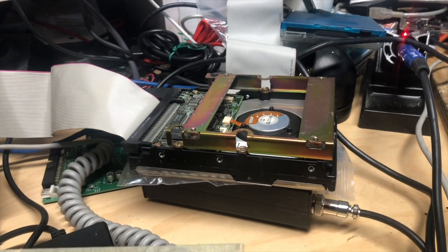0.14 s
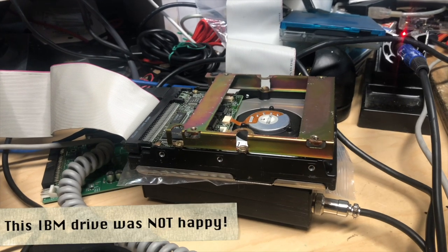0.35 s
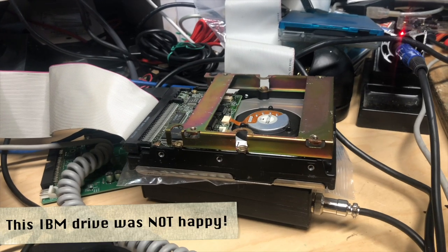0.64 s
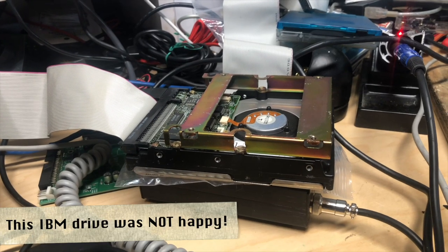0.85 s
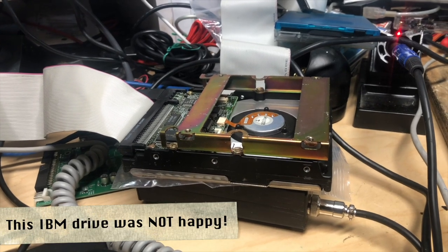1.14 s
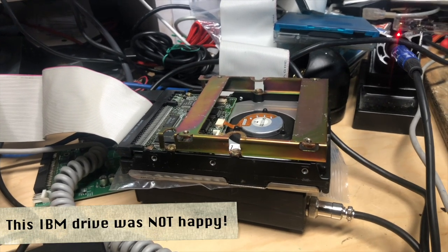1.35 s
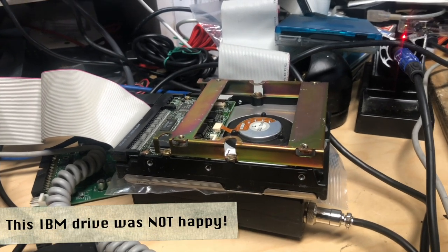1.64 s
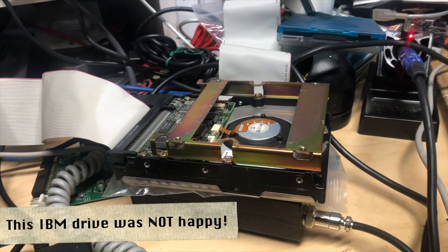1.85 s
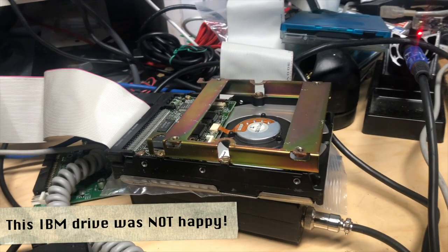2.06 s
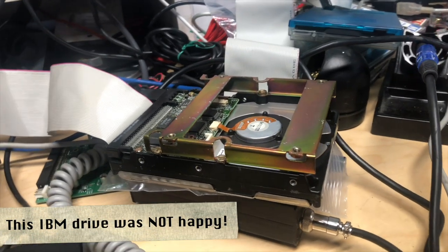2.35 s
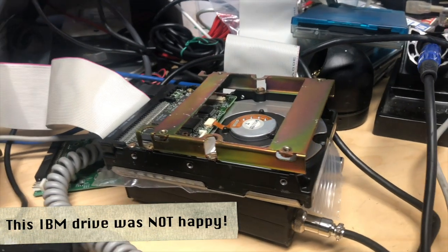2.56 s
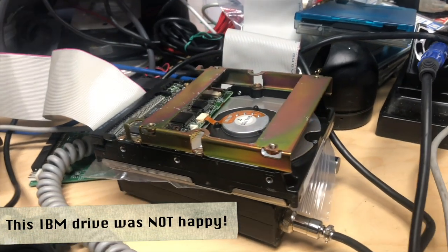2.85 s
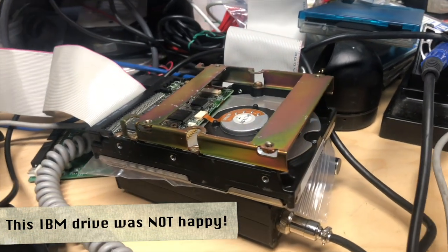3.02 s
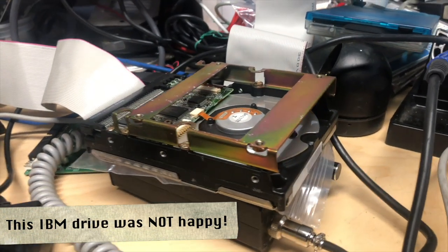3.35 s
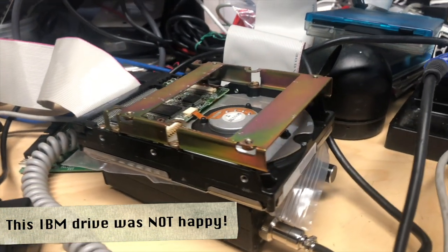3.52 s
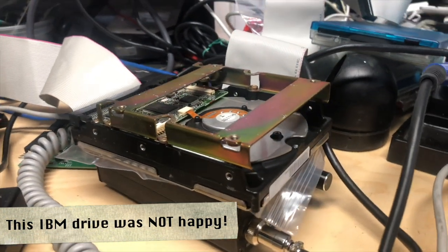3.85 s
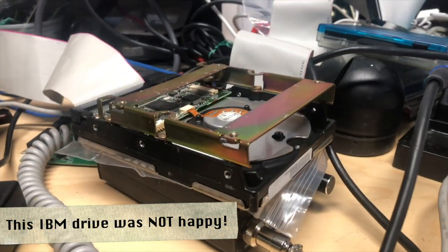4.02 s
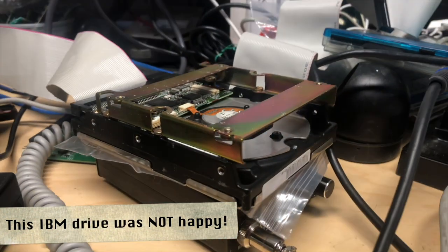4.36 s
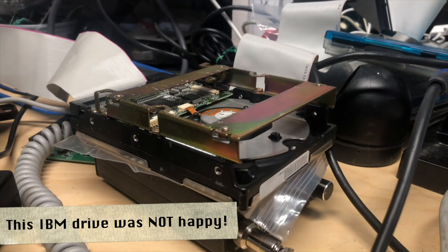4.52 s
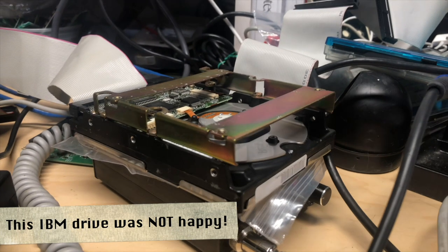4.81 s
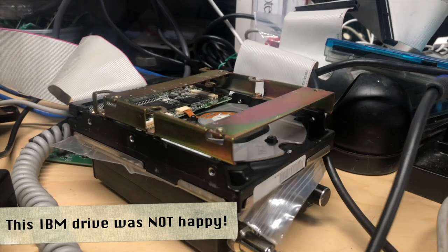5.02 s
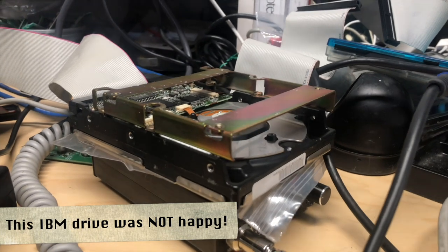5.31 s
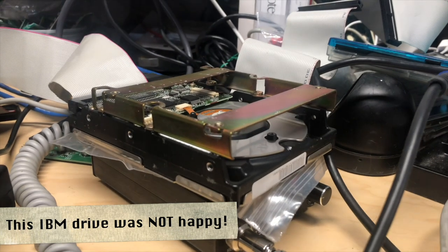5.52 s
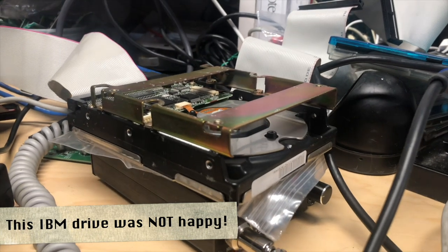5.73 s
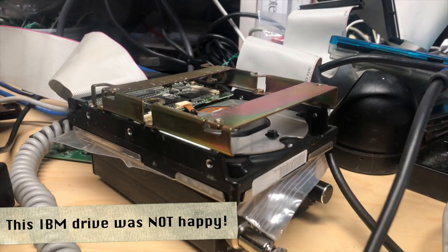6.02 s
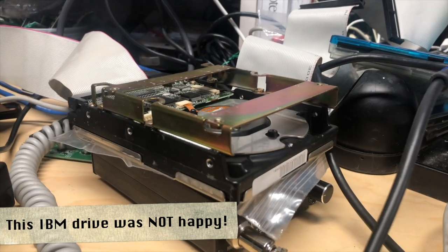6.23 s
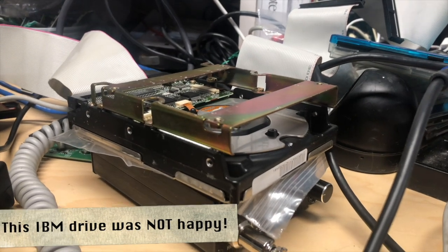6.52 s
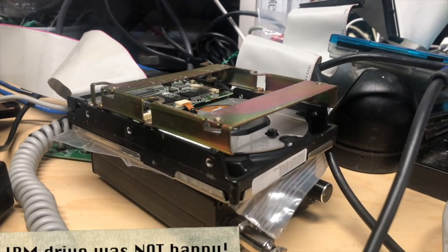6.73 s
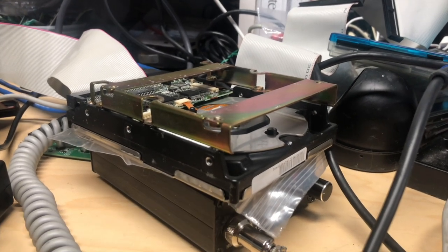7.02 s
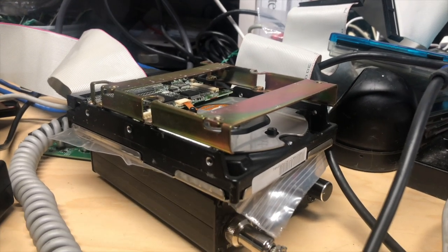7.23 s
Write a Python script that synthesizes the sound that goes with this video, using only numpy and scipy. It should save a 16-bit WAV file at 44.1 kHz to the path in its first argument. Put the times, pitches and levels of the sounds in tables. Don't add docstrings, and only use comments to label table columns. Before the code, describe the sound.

Close on a cluttered bench, a faulty open hard drive knocks its head arm against a stop, with hard bright clacks roughly every 0.6 seconds. Between them come rapid dry rattles, scratchy ticks and tiny hisses as the head rubs the platter. A high bearing whine and soft fan wind continue underneath. A hand-held phone moves from above to the side, shifting the metallic tone.

```python
import sys
import numpy as np
from scipy import signal
from scipy.fft import rfft, irfft, next_fast_len
from scipy.io import wavfile

SR = 44100
rng = np.random.default_rng(int(sys.argv[2]) if len(sys.argv) > 2 else 0)


def how_loud(loudness_db):
    steps = np.asarray(loudness_db, float) / 20
    return 10 ** steps


def store_pcm(level_fs):
    pcm = np.round(np.clip(level_fs, -1, 1) * 32767).astype(np.int16)
    wavfile.write(sys.argv[1], SR, np.atleast_2d(pcm).T)


N = 325325

# start_s, stop_peak_db, arm_re_stop_db, slider_re_stop_db
KNOCKS = [(0.165, -4, -8.5, -6.5), (0.3667, -9, -5, -2.5), (0.406, -16, -6, -5.5), (0.8693, -19.5, 0, -6),
          (0.8825, -25, 2.5, -10), (1.4863, -5.5, -8.5, -6), (1.587, -32, -4, -6), (1.597, -37, -4, -4),
          (1.6231, -17.5, 0.5, -4.5), (1.6346, -20, 0, -12), (2.1336, -19, -3, -14),
          (2.1436, -25, 4.5, -14), (2.7805, -17.5, 0.5, -5.5), (3.467, -25.5, -16, -6),
          (3.5079, -13, 1.5, -7), (3.5192, -18, 4, -8), (4.3045, -6, -3, -2), (4.8038, -18, -2, -6),
          (4.813, -21.5, -2, -10), (5.43, -15.5, -6, -6.5), (5.4403, -20.5, -1, -9), (6.033, -12, -7.5, -6),
          (6.047, -20, -2, -11), (6.052, -31, 5, -1), (6.644, -16.5, -3.5, -7.5), (6.654, -19, -1.5, -6),
          (7.2594, -16.5, -6, -6), (7.269, -22, -1, -8)]
# start_s, arm_peak_db, frame_re_arm_db, cover_re_arm_db
GRAZES = [(0.4162, -16.5, -7.5, -23), (0.76, -18.5, -5, -4), (1.065, -13.5, -2.5, -27),
          (1.2152, -19, -10, -16), (1.4225, -24, -8, 1), (1.692, -17, -14, -19), (1.711, -25.5, -8, 1.5),
          (1.8323, -33.5, -9, 5.5), (2.001, -34, 2.5, 9.5), (2.032, -26, -8, 0), (2.3346, -15.5, -19, -29),
          (2.342, -24.5, 1, -23), (2.947, -16.5, -3.5, -29), (2.972, -28.5, 1, -21), (3.043, -25, -2, -12),
          (3.717, -18, -11, -23), (4.67, -20.5, -8.5, -19), (4.692, -25.5, -8, -18),
          (5.2577, -19.5, -5, -12), (5.3017, -21, -8, -18), (5.5787, -19, -7, -32),
          (5.6128, -22.5, -4.5, -28), (5.798, -16.5, -11, -19), (6.197, -13.5, -7.5, -27),
          (6.216, -24, -11, -26), (6.242, -22, -6, -23), (6.267, -24.5, -6, -23), (6.805, -20, -16, -28),
          (6.9192, -29, 3.5, -22), (2.445, -40, 6.5, -8), (3.085, -32, 3, -12), (6.803, -22.5, -4, -22),
          (7.097, -21, -6.5, -12)]
# start_s, arm_peak_db
TICKS = [(-0.0017, -31.5), (0.0097, -24.5), (0.0306, -23.5), (0.037, -23.5), (0.065, -27.0),
         (0.0747, -28.0), (0.0823, -22.5), (0.0982, -22.5), (0.1097, -22.0), (0.1241, -27.5),
         (0.3726, -30.5), (0.4112, -27.0), (0.5529, -21.5), (0.5597, -24.0), (0.5659, -30.5),
         (0.5712, -20.0), (0.5803, -24.0), (0.5906, -23.5), (0.6063, -23.5), (0.617, -29.0),
         (0.6408, -25.5), (0.6482, -22.0), (0.6544, -29.5), (0.6709, -20.5), (0.6817, -20.0),
         (0.6953, -24.5), (0.704, -19.5), (0.7196, -24.0), (0.7349, -27.0), (0.7481, -24.5),
         (0.7684, -26.0), (1.0819, -24.0), (1.0973, -26.0), (1.1028, -31.0), (1.1172, -22.5),
         (1.1296, -21.5), (1.1401, -29.0), (1.2264, -30.0), (1.2375, -28.0), (1.2467, -21.5),
         (1.2592, -21.5), (1.2803, -21.0), (1.289, -24.0), (1.3029, -23.5), (1.3161, -20.0),
         (1.3482, -19.0), (1.3572, -20.5), (1.3625, -27.0), (1.3698, -22.5), (1.3783, -19.0),
         (1.3843, -21.5), (1.3902, -22.0), (1.4014, -20.0), (1.4168, -31.0), (1.8558, -23.0),
         (1.8675, -29.0), (1.8755, -26.5), (1.9003, -25.5),
         (1.9086, -30.5), (1.9143, -27.0), (1.9218, -23.0), (1.9265, -21.5), (1.9343, -23.0),
           (1.9453, -29.5), (1.9501, -30.0), (1.9684, -30.0), (2.358, -24.5), (2.4924, -28.5),
           (2.5022, -23.0), (2.51, -25.0), (2.5195, -27.0), (2.5296, -25.5), (2.5411, -27.0),
           (2.5517, -25.0), (2.5646, -22.5), (2.5752, -25.5), (2.5999, -27.5), (2.6106, -25.0),
           (2.6212, -22.0), (2.6299, -23.5), (2.635, -26.5), (2.6433, -27.0), (2.651, -28.0),
           (2.6755, -23.0), (2.7893, -22.0), (2.7939, -27.0), (2.9361, -31.0), (2.9522, -18.0),
           (2.9629, -30.5), (3.0324, -31.0), (3.0985, -23.0), (3.1085, -18.5), (3.119, -18.0),
           (3.1297, -16.0), (3.1394, -21.5), (3.1449, -21.0), (3.1555, -18.5), (3.1604, -23.5),
           (3.167, -28.0), (3.1745, -16.5), (3.1884, -25.5), (3.2008, -26.0), (3.2082, -26.0),
           (3.2169, -24.0), (3.2436, -27.5), (3.2665, -23.5), (3.2789, -24.5), (3.2854, -27.5),
           (3.2943, -25.0), (3.5674, -26.5), (3.5765, -19.0), (3.5989, -19.5), (3.6281, -26.0),
           (3.6376, -27.5), (3.6474, -23.0), (3.663, -27.0),
         (3.7233, -28.5), (3.7318, -25.5), (3.7395, -17.5), (3.7491, -21.5), (3.7553, -22.5),
           (3.7604, -25.0), (3.7748, -24.5), (3.7846, -27.0), (3.7963, -23.5), (3.8071, -22.5),
           (3.8273, -30.5), (3.8396, -29.0), (3.8597, -28.5), (3.8817, -25.5), (3.9076, -26.0),
           (3.9208, -21.0), (3.928, -29.5), (3.9326, -29.0), (4.3162, -31.0), (4.3393, -19.5),
           (4.3506, -26.5), (4.3738, -23.5), (4.3957, -26.0), (4.4055, -30.0), (4.4727, -27.5),
           (4.4893, -26.0), (4.4955, -20.5), (4.5071, -21.0), (4.5165, -19.0), (4.5263, -23.0),
           (4.5373, -18.5), (4.5492, -26.0), (4.557, -29.0), (4.5619, -23.5), (4.5699, -27.5),
           (4.5791, -25.0), (4.5934, -20.5), (4.6028, -24.5), (4.617, -23.5), (4.6273, -17.0),
           (4.6365, -24.0), (4.9607, -23.0), (4.9664, -21.0), (4.9715, -22.0), (4.9821, -30.0),
           (4.9961, -27.5), (5.0041, -19.5), (5.0276, -27.0), (5.1141, -24.5), (5.1373, -18.5),
           (5.1458, -24.5), (5.1618, -30.0), (5.1721, -27.0), (5.183, -23.0), (5.1897, -20.5),
           (5.2002, -20.5), (5.2065, -30.0), (5.2121, -23.0),
         (5.2209, -24.0), (5.2269, -25.5), (5.233, -30.0), (5.2438, -24.5), (5.2689, -27.0),
           (5.2802, -30.0), (5.5878, -28.5), (5.674, -29.5), (5.7356, -29.5), (5.7461, -22.5),
           (5.7523, -27.5), (5.7582, -21.5), (5.7685, -25.0), (5.7805, -27.0), (5.8122, -22.0),
           (5.8261, -25.0), (5.8346, -21.5), (5.8558, -21.0), (5.8659, -26.5), (5.8808, -24.5),
           (5.8882, -27.0), (5.9013, -24.0), (5.9106, -27.5), (5.9244, -28.0), (6.1907, -22.5),
           (6.3494, -30.5), (6.355, -27.5), (6.3617, -21.5), (6.3989, -22.5), (6.4093, -25.0),
           (6.4192, -27.5), (6.43, -26.5), (6.4414, -28.5), (6.4513, -28.0), (6.4665, -25.0),
           (6.4747, -31.0), (6.486, -28.0), (6.4951, -26.0), (6.5083, -28.5), (6.5209, -27.5),
           (6.5297, -27.0), (6.5345, -28.0), (6.5412, -29.5), (6.9545, -26.0), (6.9768, -30.0),
           (6.9856, -24.5), (7.0113, -23.0), (7.021, -23.5), (7.0328, -20.0), (7.0457, -29.0),
           (7.0504, -21.0), (7.0584, -22.5), (7.0637, -29.0), (7.0711, -24.5), (7.1059, -18.5),
           (7.1182, -29.0), (7.1284, -29.0), (7.1392, -30.0)]
# start_s, end_s
RATTLES_S = [(.015, .04), (.058, .125), (.555, .655), (.655, .75), (1.07, 1.13), (1.23, 1.315),
             (1.335, 1.405), (1.845, 1.875), (1.89, 1.945), (2.475, 2.515), (2.515, 2.655), (3.09, 3.215),
             (3.255, 3.29), (3.555, 3.66), (3.72, 3.805), (3.83, 3.92), (4.33, 4.4), (4.455, 4.58),
             (4.585, 4.635), (4.955, 5.025), (5.105, 5.17), (5.18, 5.28), (5.725, 5.83), (5.845, 5.92),
             (6.345, 6.37), (6.39, 6.54), (6.945, 6.99), (7, 7.07), (7.09, 7.125)]
# arm_share_db, frame_re_arm_db, cover_re_arm_db
RATTLES_DB = [(-2, 5.5, 6.5), (-2.5, 3.5, 5), (-2, 1.5, 5), (-2, -2.5, 2.5), (2.5, -3, -18),
              (-0.5, -3, -0.5), (-0.5, 0, -1), (-2, 1, 5.5), (-1.5, -8, 0.5), (-2.5, 4.5, 3),
              (-0.5, -6.5, 1), (-1.5, -5.5, -1), (0.5, -1, -10), (0.5, -8.5, -19), (1, -4.5, -12),
              (1, -7, -8), (2, -8.5, -27), (0.5, -2.5, -25), (0.5, -9, -21), (1, -7.5, -28), (1, -3.5, -18),
              (-1, -2.5, -10), (-0.5, -3.5, -10), (0.5, -5, -8), (0.5, 1, -11), (0.5, -4, -5),
              (0.5, -1, -14), (0, -6, -6), (2, -3.5, -12)]
# start_s, edge_peak_db, slider_re_edge_db
BITES = [(.0074, -10.5, -6.5), (0.126, -13.5, -6), (0.5557, -23, 1), (1.399, -23, -4), (1.8598, -40, -13),
         (1.9458, -31, -4), (2.502, -14, -20), (2.5067, -12, -10), (3.176, -16, -5.5), (3.2833, -19, -16),
         (3.7513, -16, -13), (3.798, -20, -7), (4.486, -21, -12), (4.494, -19, -9), (4.5926, -12.5, -7.5),
         (4.672, -20.5, -13), (5.1363, -19.5, -3), (5.184, -11.5, -13), (5.2577, -14.5, -8),
         (5.301, -20.5, -5), (5.778, -23, 0), (5.9005, -21.5, -5), (6.347, -19, -7), (6.3556, -10, -9),
         (6.404, -21, -5), (6.53, -36.5, 9), (6.806, -47, 18), (6.921, -49.5, 19), (2.952, -48, 18),
         (2.963, -50, 18), (6.966, -32, 4), (7.031, -21, -4), (7.051, -19, -6), (7.058, -16, -6),
         (7.099, -18, -2.5)]
# start_s, edge_peak_db, slider_re_edge_db, gap_s
SKIPS = [
    (0.101, -22, 0, 0.0086),
    (1.3715, -12.5, -5, 0.0087),
    (4.518, -20, -2.5, 0.0097),
    (5.7332, -27.5, -2, .0065),
    (5.7978, -20, -1.5, 0.008),
]
# start_s, fade_s, edge_db, duller_parts_re_edge_db
SWEEPS = [(.005, 0.11, -51, 5.5), (0.092, 0.026, -43.5, 4.5), (0.321, .04, -52, 7.5),
          (0.556, 0.024, -52, 6), (0.613, 0.03, -46, 3), (1.22, 0.054, -47.5, 2.5), (1.37, 0.038, -37, -2),
          (1.58, 0.026, -64.5, 20.5), (1.842, 0.032, -47.5, -1), (1.946, 0.033, -48.5, 2.5),
          (2.486, 0.029, -38, -1), (3.102, 0.066, -64, 14), (3.164, 0.015, -48, 10), (3.269, .03, -48, -1),
          (3.373, 0.036, -58, 11), (3.462, 0.038, -57.5, 12), (3.724, 0.066, -44.5, -0.5),
          (3.929, 0.034, -49, -3), (4.25, 0.051, -51.5, 7), (4.478, 0.06, -41, 2.5),
          (5.113, 0.051, -44.5, 0.5), (5.177, 0.055, -48, 6), (5.72, 0.068, -45, 2), (5.798, 0.038, -44, 4),
          (5.886, 0.036, -45.5, 4), (6.336, 0.054, -42, 2), (6.954, 0.054, -43, 1.5)]

# pitch_hz, width_hz, above_db, side_db
ARM = [(4110, 125, 0, -4), (4190, 125, -4, 0), (4600, 150, -10, -2)]
# pitch_hz, width_hz, above_db, side_db
SHANK = [(3970, 260, 0, -3), (4220, 140, -1, -8), (4410, 120, -10, 8), (5160, 260, 2, -9)]
# pitch_hz, width_hz, above_db, side_db
LATCH = [(5600, 250, -20, 1), (5540, 330, -17, 19.5), (5860, 290, 9.5, 2), (7680, 130, 2, 9),
         (4880, 1330, -10.5, -19)]
# pitch_hz, width_hz, above_db, side_db
STOP = [(5830, 440, 1, -23), (6100, 450, 28, -51), (6420, 430, -20, -1.5), (6890, 730, -16, -1)]
# pitch_hz, width_hz, above_db, side_db
SLIDER = [(7100, 130, 2, -24), (8465, 215, -2, 13), (8870, 350, -7.5, 7.5), (9620, 100, 1.5, -3),
          (9830, 83, -6.5, -35)]
# pitch_hz, width_hz, above_db, side_db
EDGE = [(10600, 350, -3, -5), (11100, 350, -3, -2), (11650, 380, 0, 0), (13000, 1600, -12, -12),
        (14100, 500, -11, -10), (15000, 550, -7, -5)]
# pitch_hz, width_hz, above_db, side_db
FRAME = [(1782, 74, -30, -3.5), (1960, 100, -8, -7.5), (2200, 61, -6.5, -9.5), (2450, 490, -13, -6.5),
         (2778, 61, 7.5, 7), (3370, 126, 1, 6.5)]
# pitch_hz, width_hz, above_db, side_db
COVER = [(1479, 45, -4, -25), (4700, 220, -3, -7), (5100, 220, 0, -18), (5400, 300, -1, -12)]

# leave_s, arrive_s
MOVE_S = (1.29, 4.38)
# time_s, fan_db, whine_db
ROOM = [
    (0.0, -48.5, 3.5),
    (1.4, -51.5, 1),
    (2.2, -52.5, -0.5),
    (3.6, -53.5, -1),
    (4.6, -52, 0),
    (7.38, -53.5, -1.5),
]
ABOVE_HZ = [1944, 2648, 2890, 3058, 3498, 4350, 5066, 7483, 7800, 8349, 9227, 9561, 10850, 13001, 15020]
ABOVE_DB = [-55, -61, -44, -57, -49, -77, -60, -56, -77, -63, -65, -69, -74, -75, -74]
SIDE_HZ = [1750, 2622, 2890, 3058, 3505, 3930, 5297, 5416, 6611, 7477, 7800, 7913, 8800, 9560, 10589, 10850,
           11750, 13001, 14580]
SIDE_DB = [-58, -58, -51, -55, -59, -60, -64, -65, -60, -63, -62, -64, -69, -71, -75, -76, -76, -75, -75]
# pitch_hz, level_db (rms)
SHARED_TONES = [(377, -62), (588, -56), (862, -67), (1008, -62), (1180, -68), (2510, -59), (2566, -60),
                (3005, -61), (3113, -62), (3500, -55)]
# pitch_hz, density_db (per Hz)
AIR = [(25, -54), (62, -29.5), (125, -16), (260, -4.5), (340, -10.5), (640, -2), (780, -11), (2080, -9),
       (2750, 0), (3300, -7.5), (4300, -11.5), (9400, -14), (10200, -20), (16000, -29.5)]


def side_view(s):
    return np.interp(s, MOVE_S, (0, 1))


def ring(modes, view, t):
    out = 0
    for hz, width_hz, above_db, side_db in modes:
        chance = rng.standard_normal((len(view), 2))
        view_db = above_db + (side_db - above_db) * view
        gain = width_hz * how_loud(view_db + 2.2 * chance[:, 0])
        swell = 1 - np.exp(-2 * np.pi * width_hz * t)
        decay = np.exp(-np.pi * width_hz * t)
        detune = 1 + .009 * chance[:, 1:]
        out = out + gain[:, None] * swell * decay * np.sin(2 * np.pi * hz * t * detune)
    return out


def strike(modes, s, peak_db, push_s, size=1024, order=1):
    t = np.arange(size) / SR
    age = t / np.reshape(push_s, (-1, 1))
    push = age ** order * np.exp(-age) * rng.standard_normal((len(s), size))
    hits = signal.fftconvolve(push, ring(modes, side_view(s), t), axes=1)
    hits *= (how_loud(peak_db) / np.abs(hits).max(axis=1))[:, None]
    out = np.zeros(N + 2 * size)
    for start, hit in zip((s * SR).astype(int), hits):
        out[start:start + len(hit)] += hit
    return out[:N]


def knocks():
    s, db, arm_db, slider_db = np.transpose(KNOCKS)
    hard = np.clip((db + 15) / 7, 0, 1)
    parts = (
        (LATCH, db - 6 * hard),
        (STOP, db - 13 * (1 - hard)),
        (ARM, db + arm_db - 3.5),
        (SHANK, db + arm_db - 3.5),
        (SLIDER, db + slider_db),
        (EDGE, db - 29.0),
    )
    return sum(strike(modes, s + .0001, part_db, 0.00035, size=768, order=2) for modes, part_db in parts)


def contacts():
    light_frame_db, light_cover_db = -8.5, -23
    start_s, end_s = np.transpose(RATTLES_S)
    s, db = np.array(TICKS).T
    rattle = np.maximum(np.searchsorted(start_s - .01, s) - 1, 0)
    arm_db, frame_db, cover_db = np.transpose(RATTLES_DB)[:, rattle]
    inside = s < end_s[rattle] + .025
    frame_db = np.where(inside, frame_db, light_frame_db)
    cover_db = np.where(inside, cover_db, light_cover_db)
    ticks = np.c_[np.maximum(s, 0), db + arm_db * inside, frame_db, cover_db]
    return np.vstack([ticks, GRAZES]).T


def grazes():
    s, db, frame_db, cover_db = contacts()
    length, delay, dullness = rng.random((len(s), 3)).T
    rub_s = .00085 * (.8 + .4 * length)
    arm = strike(ARM, s, db, 1.2 * rub_s, order=2)
    cover = strike(COVER, s, db + cover_db, 0.79 * rub_s, order=2)
    frame = strike(FRAME, s, db + frame_db, 2.38 * rub_s, size=1280, order=2)
    drag = strike(ARM + COVER[1:], s + .005 * delay, db - 15.5, 0.0089, size=1280)
    slider_db = db - 14 + 6 * side_view(s) - 8 * dullness
    slider = strike(SLIDER[1:4], s, slider_db, rub_s, size=512, order=2)
    stop = strike(STOP, s, db - 23, rub_s, size=512, order=2)
    return arm + cover + frame + drag + slider + stop


def bites():
    skips = [(s + k * gap_s, db, slider_db) for s, db, slider_db, gap_s in SKIPS for k in range(3)]
    s, db, slider_db = np.transpose(BITES + skips)
    db = np.minimum(db, -9)
    edge = strike(EDGE, s, db, 0.00071)
    slider = strike(SLIDER, s, db + slider_db, 0.00095)
    stop = strike(STOP, s, db - 7.5, 0.0016)
    return edge + slider + stop


def sweeps():
    s, fade_s, db, dull_db = np.transpose(SWEEPS)
    parts = (
        (EDGE, db + 13.5),
        (SLIDER, db + dull_db + 11.5),
        (STOP, db + dull_db + 10.5),
        (COVER, db + dull_db + 4.5),
        (ARM, db + dull_db + 14.5),
    )
    return sum(strike(modes, s, part_db, fade_s / 3, size=4096) for modes, part_db in parts)


def bench_echo(drive):
    t = np.arange(6000) / SR
    bench = rng.standard_normal(len(t)) * np.exp(-np.log(1000) * t / .13) * (t > .003)
    return how_loud(-39) * signal.fftconvolve(drive, bench)[:N]


def walk(rate_hz, step=1):
    knots = rng.standard_normal(int(N / SR * rate_hz) + 2)
    return 1.22 * np.interp(np.arange(0, N, step) * (rate_hz / SR), np.arange(len(knots)), knots)


def whine():
    step = 32
    t = np.arange(N) / SR
    slow = t[::step]
    view = side_view(slow)
    groups = (  # tones, share, waver_db
        (zip(ABOVE_HZ, ABOVE_DB), (1 - view) ** 2, 1.3),
        (zip(SIDE_HZ, SIDE_DB), view ** .5, 3),
        (SHARED_TONES, 1, 1),
    )
    out = 0
    for tones, share, waver_db in groups:
        for hz, db in tones:
            drift_rad = min(hz / 2500, 1) * .5 * walk(14, step)
            drift_rad = drift_rad + min(hz / 7500, 1.1) ** 2 * walk(260, step)
            level_db = db + waver_db * walk(9, step) + min(hz / 3000, 2.5) * walk(70, step)
            gain = share * how_loud(level_db) * np.sqrt(2)
            phase = 2 * np.pi * (hz * t + rng.random()) + np.interp(t, slow, drift_rad)
            out = out + np.interp(t, slow, gain) * np.sin(phase)
    return out


def unit(x):
    return x / np.sqrt(np.mean(x ** 2))


def air():
    hz, db = np.transpose(AIR)
    size = next_fast_len(N)
    bins_hz = np.arange(size // 2 + 1) * SR / size
    views = []
    for _ in range(2):
        ripple_db = 2.4 * walk(60)[:len(bins_hz)] * np.clip(bins_hz / 3500, 0, 1) ** 2
        colour = how_loud(np.interp(np.log(bins_hz + 1), np.log(hz), db) + ripple_db)
        noise = rng.standard_normal(size)
        views.append(unit(irfft(rfft(noise) * colour, size)[:N]))
    turn_rad = side_view(np.arange(N) / SR) * np.pi / 2
    above, side = views
    return (above * np.cos(turn_rad) + side * np.sin(turn_rad)) * how_loud(0.71 * walk(5.2))


def scene():
    time_s, room_fan_db, room_whine_db = np.transpose(ROOM)
    t = np.arange(N) / SR
    fan_db = np.interp(t, time_s, room_fan_db)
    whine_db = np.interp(t, time_s, room_whine_db)
    drive = knocks() + grazes() + bites() + sweeps()
    drive = signal.sosfilt(signal.butter(4, 1250, "high", fs=SR, output="sos"), drive)
    drive = drive + bench_echo(drive)
    return (drive + how_loud(fan_db + 9.5) * air() + how_loud(whine_db) * whine())[None]


def band_limit(x):
    return signal.sosfilt(signal.butter(12, 16990, fs=SR, output="sos"), x)


def record(dry):
    rounded = np.tanh(dry)
    low_pass = signal.ellip(10, .2, 40, 15700, fs=SR, output="sos")
    return band_limit(signal.sosfilt(low_pass, rounded))


dry = scene()
out = record(dry)
store_pcm(out)
```